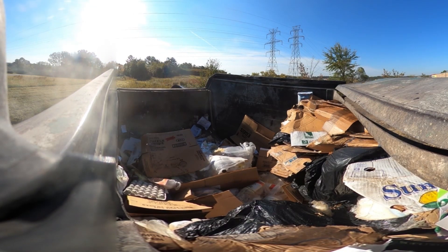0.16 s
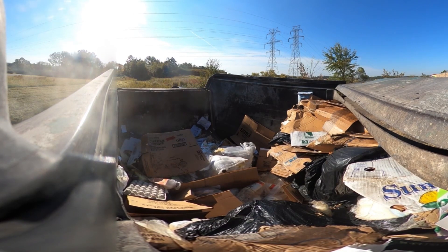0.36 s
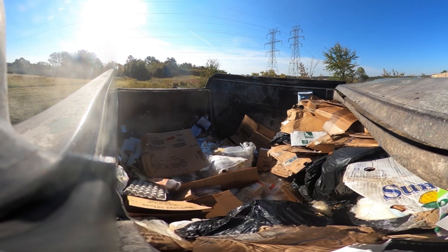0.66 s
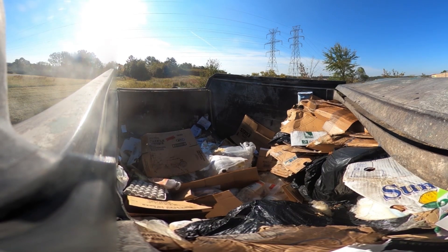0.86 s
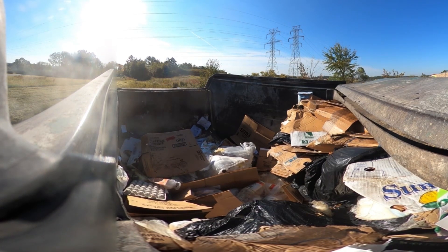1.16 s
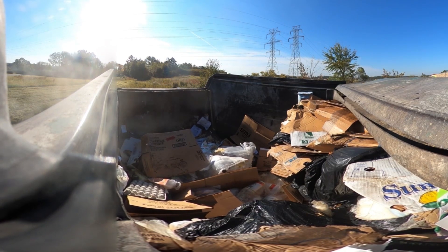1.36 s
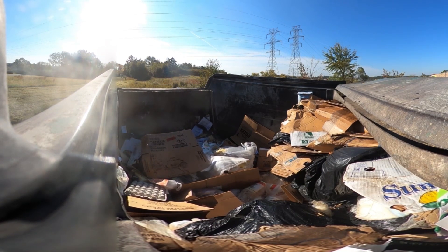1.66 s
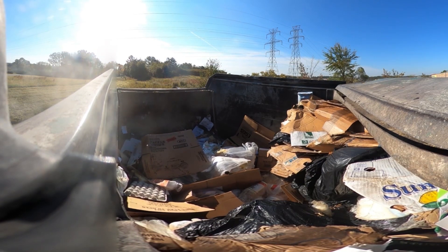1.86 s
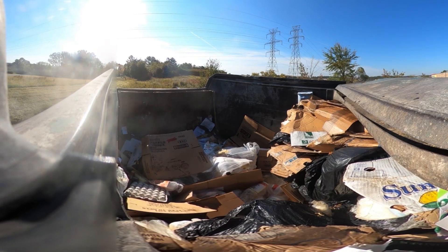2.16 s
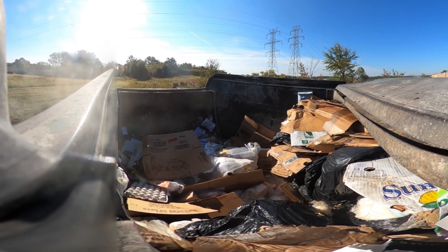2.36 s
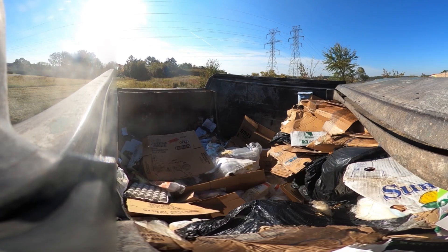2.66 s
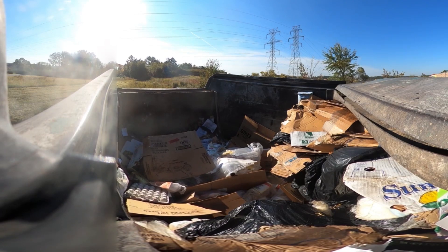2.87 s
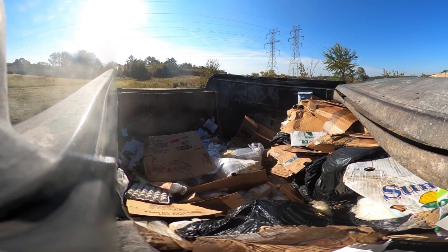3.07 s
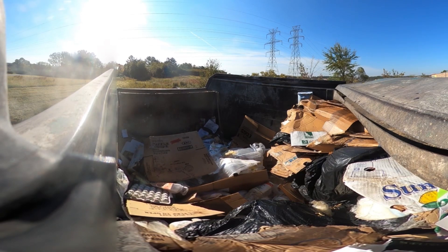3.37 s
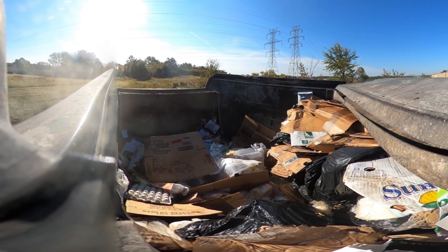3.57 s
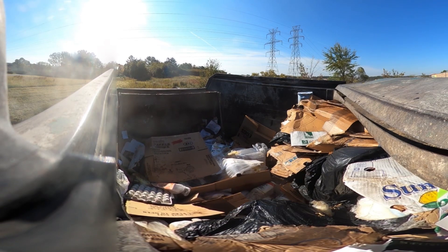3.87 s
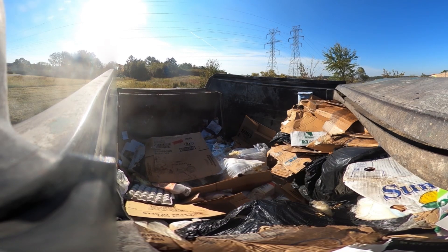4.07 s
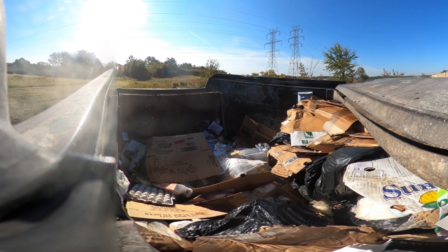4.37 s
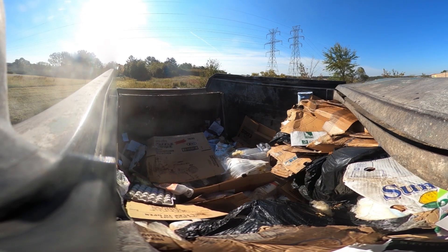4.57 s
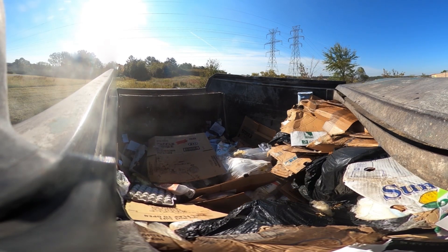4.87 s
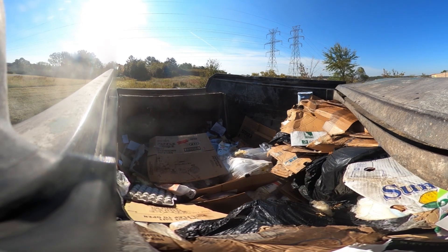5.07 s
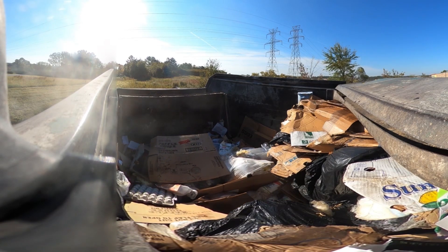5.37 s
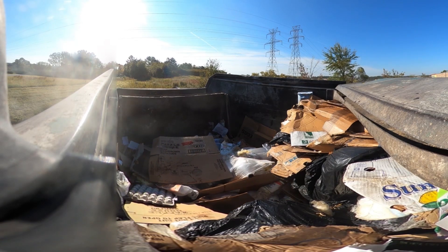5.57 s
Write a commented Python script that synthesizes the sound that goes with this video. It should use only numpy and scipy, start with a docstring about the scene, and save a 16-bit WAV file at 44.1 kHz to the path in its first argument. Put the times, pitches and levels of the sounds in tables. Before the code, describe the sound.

A diesel garbage truck idles and hums while a steel dumpster bangs and its load slides out, then the engine revs up.

```python
"""Garbage truck with a dumpster

A diesel idles with its hydraulic pump humming, then speeds up by half; both are tones tied to the crank.
A dumpster bangs and its load slides for a second (ringing steel), air puffs out (shaped noise) and the
hopper walls boom (decaying tones). A hard, steady clatter of ringing knocks runs underneath, a faint
turbo whistle climbs, panels judder, and loose rubbish crinkles and ticks (filtered clicks and noise)."""
import sys
import numpy as np
from scipy import signal
from scipy.fft import rfft, irfft, next_fast_len
from scipy.io import wavfile
from scipy.ndimage import uniform_filter1d

SR = 44100
rng = np.random.default_rng(int(sys.argv[2]) if len(sys.argv) > 2 else 0)


def digitize_waveform(pressure):
    """Quantize a signal to 16-bit integers and store it at the path in sys.argv[1].

    Rows of a 2-D input are taken as channels; values are limited to [-1, 1].
    """
    field = np.atleast_2d(pressure).T
    bounded = np.clip(field, -1, 1)
    quanta = np.round(bounded * 32767).astype(np.int16)
    wavfile.write(sys.argv[1], SR, quanta)


N = 252693  # length in samples


def amp(db):
    """Turn decibels into a gain."""
    return 10 ** (np.asarray(db) / 20)


def seconds():
    """The time of every sample."""
    return np.arange(N) / SR


def curve(rows, axis=1):
    """One column of a table, joined by straight lines in time."""
    rows = np.asarray(rows)
    return np.interp(seconds(), rows[:, 0], rows[:, axis])


def unit(x):
    """Scale to an rms of 1."""
    return x / np.sqrt(np.mean(x ** 2))


def colour(x, points):
    """Filter a sound to follow (Hz, dB) points; the minimum-phase response never sounds ahead of its input."""
    size = 2 * next_fast_len(len(x))
    hz, db = np.transpose(points)
    grid = np.maximum(np.arange(size // 2 + 1) * SR / size, 1)
    response_db = np.interp(np.log(grid), np.log(hz), db)
    # folding the cepstrum onto positive times makes the filter causal
    cepstrum = irfft(np.log(amp(response_db)))
    cepstrum[1:size // 2] *= 2
    cepstrum[size // 2 + 1:] = 0
    return irfft(rfft(x, size) * np.exp(rfft(cepstrum)))[:len(x)]


def split(x, hz):
    """The parts below and above a frequency."""
    filters = [signal.butter(4, hz, kind, fs=SR, output="sos") for kind in ("low", "high")]
    return [signal.sosfilt(sos, x) for sos in filters]


def walk(rate):
    """Slow random drift with an rms of 1; a higher rate drifts faster."""
    k = int(SR / rate)
    steps = np.repeat(rng.standard_normal(N // k + 1), k)
    smooth = uniform_filter1d(uniform_filter1d(steps, k), k)
    return unit(smooth[:N])


def grains(rate, spread_db):
    """Random clicks, about rate per second, most small and a few large."""
    hits = rng.random(N) < rate / SR
    signs = rng.choice([-1, 1], N)
    sizes = amp(spread_db * np.minimum(rng.exponential(size=N), 4))
    return unit(hits * signs * sizes)


def fade(t, t60):
    """Free decay of a ring, down 60 dB after t60 seconds."""
    return np.exp(-np.log(1000) * t / t60)


def bump(x, centre, width):
    """Bell curve with a top of 1."""
    return np.exp(-((x - centre) / width) ** 2)


def swell(peak_s, rise_db_per_s, fall_db_per_s):
    """Gain that climbs to 1 and falls away, each at a steady rate in dB."""
    t = seconds() - peak_s
    return amp(np.where(t < 0, rise_db_per_s * t, -fall_db_per_s * t))


def during(start, end, attack, release):
    """Gate that opens at start and is shut again by end."""
    t = seconds()
    return np.clip(np.minimum((t - start) / attack, (end - t) / release), 0, 1)


def add(out, s, x):
    """Mix x into out from time s."""
    i = int(s * SR)
    out[i:i + len(x)] += x[:N - i]


# Tone of card and bags. Each row: frequency in Hz, level in dB.
CRINKLE_TONE = [(1500, -31.5), (3500, 0.5), (5500, 5.5), (8000, -4.5), (9600, -8.5), (10600, -16),
                (12000, -21), (15000, -38.5)]
# The bags shift and crinkle louder. Each row: middle in seconds, half-length in seconds, rise in dB.
BAG_SHIFTS = [(3.07, 0.23, 17), (4.27, .3, 15)]
# Single ticks of rubbish. Each row: start in seconds, peak level in dB.
RUBBISH_TICKS = [(1.51, -41), (2.533, -38), (2.9854, -46), (3.0574, -45), (3.5894, -43), (3.7592, -40),
                 (4.2544, -36), (4.802, -41), (5.4894, -42), (5.552, -40)]
CRINKLE_DB = -71  # between the shifts
CRINKLES_PER_S, CRINKLE_SPREAD_DB = 900, 3.4


def rubbish():
    """Plastic bags crinkle as a stream of tiny clicks, and card ticks as short fading bursts of noise."""
    shifting_db = sum(db * bump(seconds(), s, width) for s, width, db in BAG_SHIFTS)
    crinkle = unit(colour(grains(CRINKLES_PER_S, CRINKLE_SPREAD_DB), CRINKLE_TONE))
    out = crinkle * amp(CRINKLE_DB + shifting_db)
    t = np.arange(SR // 10) / SR
    for s, db in RUBBISH_TICKS:
        tick = colour(rng.standard_normal(len(t)) * fade(t, 0.032), CRINKLE_TONE)
        add(out, s, amp(db) * tick / np.abs(tick).max())
    return out


# The body shudders as the engine picks up. Each row: start in seconds, length in seconds, level in dB.
SHUDDER_SPELLS = [(3.61, 0.315, -30), (4.095, 0.41, -31)]
# Tone of the juddering panels. Each row: frequency in Hz, level in dB.
SHUDDER_TONE = [(60, -28.5), (130, -11), (195, 1.5), (280, 1.5), (360, -14.5), (650, -16.5), (1000, -33),
                (3000, -73)]
SHUDDER_ATTACK_S, SHUDDER_RELEASE_S = 0.036, .12


def shudder():
    """Loose panels judder in short, rough spells of dense clicks."""
    gain = sum(amp(db) * during(s, s + length, SHUDDER_ATTACK_S, SHUDDER_RELEASE_S)
               for s, length, db in SHUDDER_SPELLS)
    return gain * unit(colour(grains(TUMBLES_PER_S, TUMBLE_SPREAD_DB), SHUDDER_TONE))


THROTTLE_OPENS_S, THROTTLE_FULL_S = 2.8, 3.7


def throttle():
    """The throttle opens evenly: 0 at idle, 1 wide open."""
    return np.interp(seconds(), [THROTTLE_OPENS_S, THROTTLE_FULL_S], [0, 1])


IDLE_TURNS_PER_S, FULL_TURNS_PER_S = 10.8, 16.1
FLYWHEEL_LAG_S = .65  # time constant
PUMP_DRAG_TURNS_PER_S, PUMP_DRAG_S = .28, .13  # the last pump stroke holds the crank back


def crank_speed():
    """Turns per second: the flywheel lags behind the throttle, with a brief dip as the last stroke ends."""
    step = 1 / (FLYWHEEL_LAG_S * SR)
    lagged = signal.lfilter([step], [1, step - 1], throttle())
    free = IDLE_TURNS_PER_S + (FULL_TURNS_PER_S - IDLE_TURNS_PER_S) * lagged
    last_end = PUMP_STROKES[-1][1]
    return free - PUMP_DRAG_TURNS_PER_S * bump(seconds(), last_end - PUMP_DRAG_S / 2, PUMP_DRAG_S)


TURBO_FULL_HZ, TURBO_SPEED_POWER = 3440, 2.4
TURBO_DB, TURBO_DB_PER_TURN_S = -50.5, 13  # at full speed; loss per turn a second below it
TURBO_WAVER = .006  # share of the pitch


def turbo():
    """A faint, airy whistle whose pitch and level climb with the crank speed."""
    speed = crank_speed()
    steady_hz = TURBO_FULL_HZ * (speed / FULL_TURNS_PER_S) ** TURBO_SPEED_POWER
    hz = steady_hz * (1 + TURBO_WAVER * walk(60))
    flutter = unit(1 + .9 * walk(250))
    gain = amp(TURBO_DB - TURBO_DB_PER_TURN_S * (FULL_TURNS_PER_S - speed))
    return gain * np.sqrt(2) * flutter * np.sin(2 * np.pi * np.cumsum(hz) / SR)


# Strength of six knocks in turn. Each entry: level in dB.
KNOCK_STRENGTHS = [-4.5, -1.5, -4, -4, 0, -4]
# Rings of the engine casing. Each row: frequency in Hz, level in dB.
CASING_RINGS = [(1080, -5.5), (1285, 5), (1450, -8.5), (1800, -10), (2350, -7.5), (2698, -10)]
# Tone of the mechanical rush. Each row: frequency in Hz, level in dB.
RUSH_TONE = [(200, -26), (480, -6.5), (620, -3), (820, -4.5), (1080, 0.5), (1400, -2), (1780, -5),
             (2000, -8), (2700, -9), (3100, -14), (3700, -18), (4200, -20), (5000, -35.5), (7000, -56.5),
             (11000, -94)]
# Tone of the fine sizzle. Each row: frequency in Hz, level in dB.
SIZZLE_TONE = [(1500, -54), (3000, -22.5), (4500, -2), (5300, 2), (6300, -3), (7400, -2.5), (8500, -10),
               (9700, -21), (10500, -20.5), (12000, -31.5), (15000, -39.5)]
KNOCKS_PER_S, KNOCK_SCATTER_DB = 48.8, .6
KNOCK_ATTACK_S, KNOCK_JITTER_S = .004, .0007
CASING_T60_S = .023
CASING_SCATTER = .02  # share by which a ring's pitch differs from hit to hit
# levels at idle, ahead of the overall engine level
KNOCK_DB, RUSH_DB, SIZZLE_DB = -40, -37, -54.5
# change at full throttle
KNOCK_THROTTLE_DB, RUSH_THROTTLE_DB, SIZZLE_THROTTLE_DB = -1.5, 2, 0.1


def clatter():
    """Each knock briefly rings the casing, most near 1.3 kHz, over a mechanical rush and a fine sizzle."""
    load = throttle()
    cycles = np.cumsum(KNOCKS_PER_S * (1 + .002 * walk(40) + .001 * walk(1))) / SR
    index = cycles.astype(int)  # which knock each sample belongs to
    count = index[-1] + 1
    late = KNOCK_JITTER_S * np.maximum(1 + rng.standard_normal(count), 0)
    age = np.maximum(cycles % 1 / KNOCKS_PER_S - late[index], 0)  # seconds since the knock
    scatter_db = KNOCK_SCATTER_DB * rng.standard_normal(count)[index]
    strength = amp(np.take(KNOCK_STRENGTHS, index, mode="wrap") + scatter_db)
    push = strength * (1 - np.exp(-age / KNOCK_ATTACK_S))
    rings = 0
    for hz, db in CASING_RINGS:
        pitch = hz * (1 + CASING_SCATTER * rng.standard_normal(count))[index]
        rings = rings + amp(db) * np.sin(2 * np.pi * (pitch * age + rng.random(count)[index]))
    # rough contact makes the rings' strength flicker a little
    rough_rings = rings * (1 + 0.2 * walk(1500))
    knocks = unit(split(push * fade(age, CASING_T60_S) * rough_rings, 3300)[0])
    burst = unit(push * fade(age, 0.028))
    # the rush pulses lightly with the knocks
    pulsing = 1 + .12 * burst
    rush = unit(colour(pulsing * rng.standard_normal(N), RUSH_TONE))
    bursts = .4 * burst * rng.standard_normal(N)
    sizzle = unit(colour(rng.standard_normal(N) + bursts + 0.5 * grains(250, 3.6), SIZZLE_TONE))
    return (knocks * amp(KNOCK_DB + KNOCK_THROTTLE_DB * load)
            + rush * amp(RUSH_DB + RUSH_THROTTLE_DB * load)
            + sizzle * amp(SIZZLE_DB + SIZZLE_THROTTLE_DB * load))


# Tone of the air jet. Each row: frequency in Hz, level in dB.
AIR_TONE = [(900, -12), (1800, 0), (3800, 2.5), (4600, -11), (5300, 3.5), (6200, 3), (7600, 3),
            (8300, -5.5), (9300, -17), (10500, -25.5), (12000, -31), (15000, -54)]
# Whistles from the valve. Each row: frequency in Hz, level in dB.
VALVE_WHISTLES = [(5098, -3), (5373, -15), (5599, -10), (6363, -5), (7074, 1), (7359, -13), (7612, -9),
                  (7854, -9)]
# A few puffs lose pressure until the valve shuts. Each row: time in seconds, level in dB.
AIR_PUFFS = [(.315, -43), (.395, -32), (.445, -36.5), (.497, -32.5), (.535, -36.5), (.59, -31.5),
             (.67, -39), (.72, -35), (.77, -40), (.9, -38.5), (1.0, -46), (1.21, -49.5), (1.32, -58)]
AIR_ATTACK_S, AIR_RELEASE_S = 0.0099, 0.098


def air():
    """A puffing, fluttering jet of noise with faint whistles from the valve."""
    t = seconds()
    jet = unit(colour(rng.standard_normal(N) + .5 * grains(1000, 1.5), AIR_TONE))
    whistles = unit(sum(amp(db) * walk(35.6) * np.sin(2 * np.pi * hz * t) for hz, db in VALVE_WHISTLES))
    flow = amp(curve(AIR_PUFFS) + .8 * walk(60))
    hiss = jet + amp(-14) * whistles
    return hiss * flow * during(AIR_PUFFS[0][0], AIR_PUFFS[-1][0], AIR_ATTACK_S, AIR_RELEASE_S)


# Ringing of the hopper walls.
# Each row: start in seconds, frequency in Hz, level in dB, time to fade by 60 dB in seconds.
WALL_BOOMS = [(0.32, 40, -6.5, 1.3), (0.61, 57.5, -6, 0.61), (0.83, 55.5, -6, 0.82),
              (1.372, 55.84, -5, 1.5), (1.335, 226, -4, 0.19), (1.41, 219.4, -22, .7),
              (1.39, 165.3, -22, 1.6), (1.64, 55.6, -6, 0.79), (3.54, 52, -3, 0.2), (4.217, 59, -9.5, 0.94)]


def hopper():
    """The big walls swell into a ring, mostly deep, after a jolt; each ring is a fading sine."""
    t, out = np.arange(SR) / SR, np.zeros(N)
    for s, hz, db, t60 in WALL_BOOMS:
        build = 1 - np.exp(-t / 0.032)
        add(out, s, amp(db) * np.sin(2 * np.pi * hz * t) * fade(t, t60) * build)
    return out


# Tone of the sheet-metal wash. Each row: frequency in Hz, level in dB.
STEEL_TONE = [(41, -16.5), (70, 8), (87, -4), (113, 3.5), (180, 0), (245, 1.5), (425, -10), (490, -12.5),
              (536, -16.5), (689, -19), (1360, -23.5), (2160, -36.5), (2400, -35), (2770, -38), (5000, -43),
              (6500, -70.5), (11000, -120)]
# Clear rings of the dumpster panels.
# Each row: frequency in Hz, level in dB, time to fade by 60 dB in seconds.
PANEL_RINGS = [(76.9, 13.5, 0.87), (128, 2, 0.15), (164, 4.5, 0.19), (238, -11.5, 0.09), (250, 1, 0.5),
               (277, -8, 0.22), (363, -11, 0.71), (407.5, -3, 0.37), (567.4, 1, 0.57), (736, -4, 0.34),
               (770, -31, 0.78)]
PANEL_SCATTER = .02  # share by which a ring's pitch differs from hit to hit


def steel(t60, panel_db):
    """One blow on the dumpster: a dense wash of sheet-metal modes and a few clear panel rings."""
    t = np.arange(SR) / SR
    wash = unit(colour(rng.standard_normal(SR) * fade(t, t60), STEEL_TONE))
    rings = 0
    for hz, db, ring_t60 in PANEL_RINGS:
        sign = rng.choice([-1, 1])
        pitch = hz * rng.normal(1, PANEL_SCATTER)
        rings = rings + amp(db) * sign * np.sin(2 * np.pi * pitch * t) * fade(t, ring_t60)
    return wash + amp(panel_db) * unit(rings)


TUMBLES_PER_S, TUMBLE_SPREAD_DB = 700, 1.6


def tumble(count):
    """Small pieces rain on several parts of the dumpster, each with its own ring."""
    parts = 0
    for _ in range(count):
        hits = grains(TUMBLES_PER_S, TUMBLE_SPREAD_DB)
        parts = parts + signal.fftconvolve(hits, steel(0.06, -17))[:N]
    return parts


# Blows on the dumpster.
# Each row: start in seconds, peak level in dB, lift of the part above 520 Hz in dB.
DUMPSTER_BLOWS = [(0.325, -12, 1), (0.342, -14.5, -1), (0.395, -13, 0), (.583, -9, 6), (.607, -9.5, 14),
                  (.665, -13.5, 11), (0.711, -10.5, 8), (0.741, -9, 7.5), (0.81, -9, -4), (.934, -16, -6),
                  (0.976, -11, -13), (1.06, -13, -13.5), (1.136, -11.5, -11), (1.175, -16.5, -8),
                  (1.337, -13.5, 3), (1.358, -10, -2.5), (1.435, -21, 3)]
# The slide's thud, rattle and scrape, in that order.
# Each row: level at the peak in dB, rise in dB per second, fall in dB per second.
SLIDE_LAYERS = [(-15.5, 5, 13), (-24.5, 13, 14), (-26.5, 3.5, 25.5)]
# Borders between thud, rattle and scrape. Each entry: frequency in Hz.
SLIDE_BORDERS = (390, 713)
# the load slides ever harder up to a peak, then thins out and comes to rest
SLIDE_PEAK_S, SLIDE_END_S, SLIDE_RELEASE_S = 0.64, 1.794, 0.49


def dumpster():
    """Hard blows stand out of a dense tumble; the higher the sound of the slide, the sooner it dies."""
    thud, rest = split(tumble(count=8), SLIDE_BORDERS[0])
    rattle, scrape = split(rest, SLIDE_BORDERS[1])
    out = np.zeros(N)
    for part, (db, rise, fall) in zip((thud, rattle, scrape), SLIDE_LAYERS):
        out += unit(part) * amp(db) * swell(SLIDE_PEAK_S, rise, fall)
    # the first blow sets the load moving
    out *= during(DUMPSTER_BLOWS[0][0], SLIDE_END_S, 0.0059, SLIDE_RELEASE_S)
    for s, db, bright_db in DUMPSTER_BLOWS:
        low, high = split(steel(0.21, -6.5), 520)
        blow = low + amp(bright_db) * high
        add(out, s, amp(db) * blow / np.abs(blow).max())
    return out


# Body resonances that lift a tone as it sweeps through.
# Each row: frequency in Hz, width in Hz, lift in dB.
BODY_RESONANCES = [(71, 1.4, 7), (97.5, 1.7, 8), (177.2, 6.2, 8), (211.2, 8, 4), (266, 8.5, 3.5),
                   (300, 3.2, 8.5), (402, 20, 3), (443, 7, 6)]


def body_db(hz):
    """How much the body's resonances lift a tone of this pitch."""
    return sum(db * bump(hz, centre, width) for centre, width, db in BODY_RESONANCES)


def crank_tone(turn, order):
    """A sine at one multiple of the crank rotation; uneven firings smear the upper ones most."""
    uneven_turn = turn + 0.011 * walk(30)
    # the order squared puts the tones out of step with each other
    return np.sqrt(2) * np.sin(order * uneven_turn + order ** 2)


# Hydraulic hum under load. Each row: start in seconds, end in seconds, multiple of the crank speed,
# level at full pressure in dB, time constant of the build-up in seconds, release in seconds.
PUMP_STROKES = [(0, 0.37, 9, -20.5, 0.007, 0.42), (1.33, 3.44, 10, -14.5, 0.72, 0.36),
                (3.37, 3.65, 10, -16.5, 0.077, 0.13)]
# Overtones of the hum. Each row: harmonic number, level in dB ahead of the body's lift.
HUM_OVERTONES = [(2, -35.5), (3, -44.5)]


def pump(turn):
    """The crank drives the pump; its hum grows with pressure in a stroke, its overtones saturate early."""
    out, speed = 0, crank_speed()
    for start, end, order, db, build, release in PUMP_STROKES:
        pressure = 1 - np.exp(-np.maximum(seconds() - start, 0) / build)
        hum = pressure * amp(db + .5 * walk(15)) * crank_tone(turn, order)
        for k, overtone_db in HUM_OVERTONES:
            level = amp(overtone_db + body_db(k * order * speed))
            hum += np.tanh(1.54 * pressure) * level * crank_tone(turn, k * order)
        out = out + hum * during(start, end, 0.012, release)
    return out


# Engine tones, a multiple near 3 being the firing rate.
# Each row: multiple of the crank speed, level in dB at idle, level in dB at full throttle,
# both ahead of the body's lift and the overall engine level.
ENGINE_TONES = [(2.04, -45, -42), (3.017, -23, -14), (4.5, -35.5, -44.5), (6.01, -25.5, -27),
                (7.11, -46, -37), (9, -39.5, -44.5), (10, -44.5, -26.5), (12.01, -54, -39.5),
                (14.08, -43.5, -43.5), (14.97, -45, -48.5), (15.97, -46.5, -44), (17.8, -53, -48.5),
                (19.87, -52, -40), (25.94, -62.5, -55.5), (28.05, -66.5, -48.5), (34.44, -63.5, -52),
                (40, -60.5, -51)]
# Tone of the body's rumble. Each row: frequency in Hz, level in dB.
RUMBLE_TONE = [(18, -22), (32, -4.5), (48, 0.5), (55, 9.5), (62, -4), (80, 1), (130, -7), (190, -9),
               (270, -12), (380, -18.5), (600, -25.5), (1200, -57.5), (5000, -91.5)]
RUMBLE_IDLE_DB, RUMBLE_FULL_DB = -28, -26.5  # ahead of the overall engine level
RUMBLE_STRAIN_DB = 2  # rise per unit of strain


def engine(turn):
    """Six cylinders fire three times a turn; throttle balances the tones, and gathering speed adds rumble."""
    load, speed, tones = throttle(), crank_speed(), 0
    for order, idle_db, full_db in ENGINE_TONES:
        waver_db = min(0.14 * order, 2.2) * walk(8)
        throttle_db = idle_db + (full_db - idle_db) * load
        level = amp(throttle_db + body_db(order * speed) + waver_db)
        tones = tones + level * crank_tone(turn, order)
    # strain is how far the crank speed is behind the throttle
    strain = load - (speed - IDLE_TURNS_PER_S) / (FULL_TURNS_PER_S - IDLE_TURNS_PER_S)
    rumble = unit(colour(rng.standard_normal(N), RUMBLE_TONE))
    rumble_db = RUMBLE_IDLE_DB + (RUMBLE_FULL_DB - RUMBLE_IDLE_DB) * load + RUMBLE_STRAIN_DB * strain
    return tones + rumble * amp(rumble_db)


# Overall level of engine, turbo and clatter, which dips after the dumping.
# Each row: time in seconds, level in dB.
OVERALL_ENGINE_LEVEL = [(0, 2.5), (.25, 4), (.6, -1), (1.3, 0.5), (1.65, -4), (2.3, -0.5), (3.1, .5),
                        (4.3, -0.03), (4.9, -0.5), (5.73, 0.7)]


def scene():
    """Mix all the layers; one slightly uneven crank rotation drives both engine and pump."""
    turn = 2 * np.pi * np.cumsum(crank_speed() * (1 + 0.0031 * walk(14))) / SR
    background = rubbish() + shudder() + air() + hopper() + dumpster()
    motor = (turbo() + clatter() + engine(turn)) * amp(curve(OVERALL_ENGINE_LEVEL))
    return (background + motor + pump(turn))[None]


TOP_HZ = 15200


def record(dry):
    """Drop the deepest rumble, round the peaks and cut the top."""
    x = signal.sosfilt(signal.butter(2, 18, "high", fs=SR, output="sos"), dry)
    rounded = np.tanh(0.68 * x) / 0.71
    return signal.sosfilt(signal.ellip(8, .2, 70, TOP_HZ, fs=SR, output="sos"), rounded)


dry = scene()
out = record(dry)
digitize_waveform(out)
```